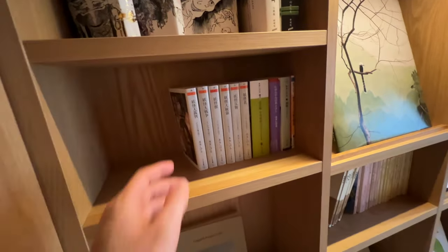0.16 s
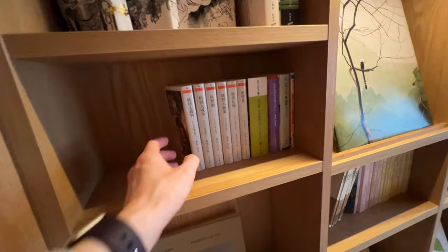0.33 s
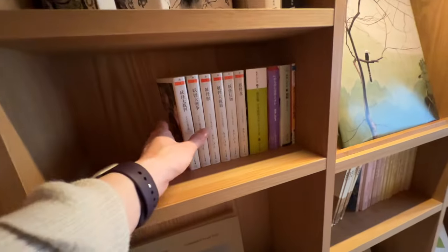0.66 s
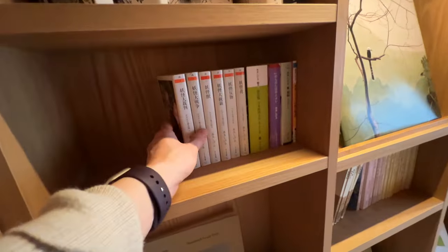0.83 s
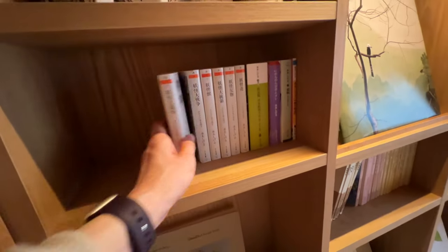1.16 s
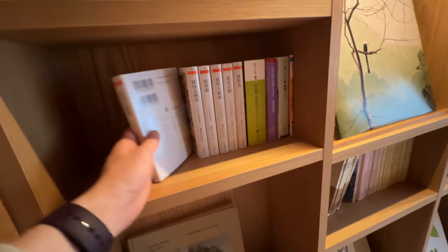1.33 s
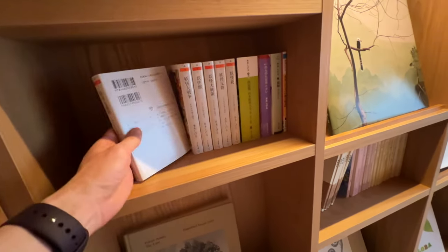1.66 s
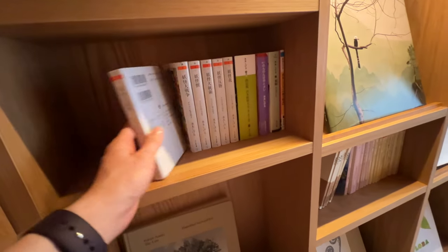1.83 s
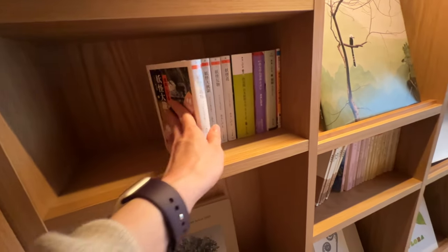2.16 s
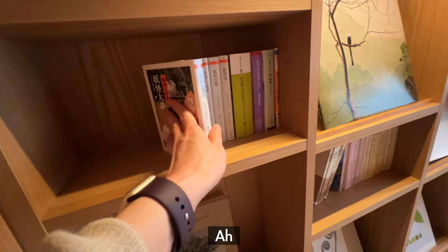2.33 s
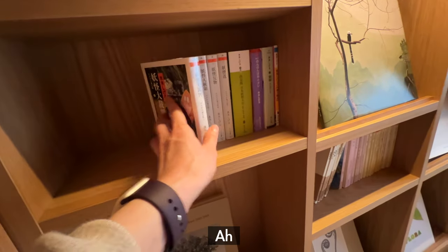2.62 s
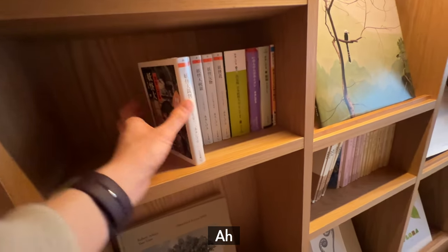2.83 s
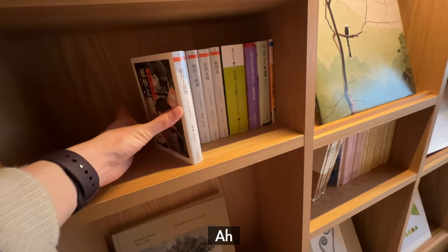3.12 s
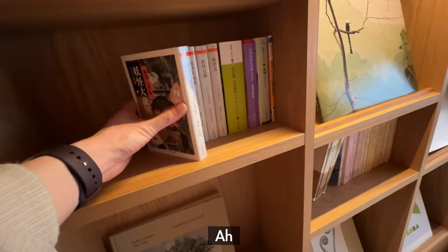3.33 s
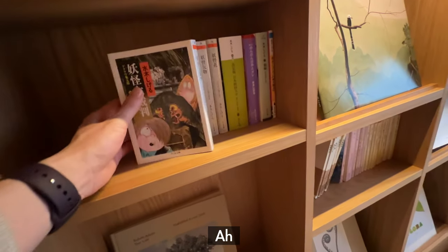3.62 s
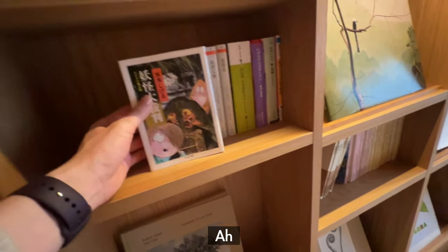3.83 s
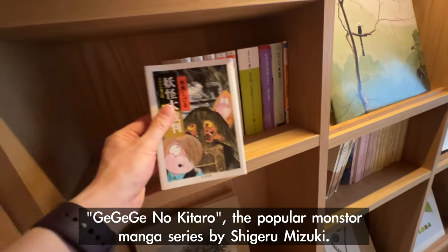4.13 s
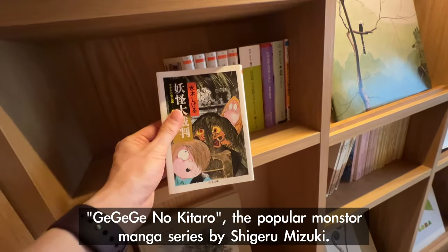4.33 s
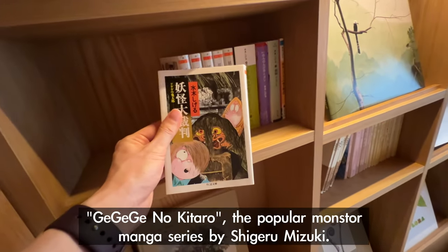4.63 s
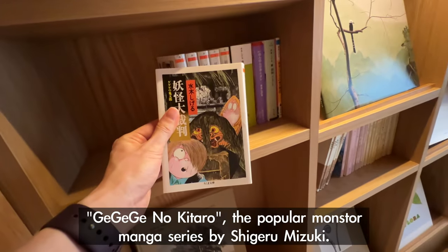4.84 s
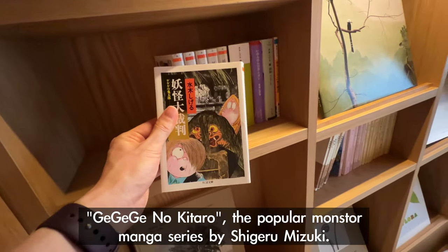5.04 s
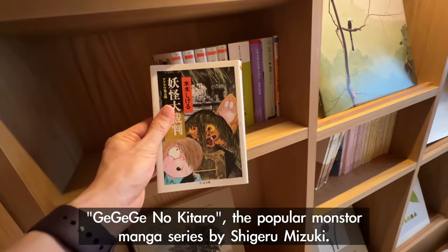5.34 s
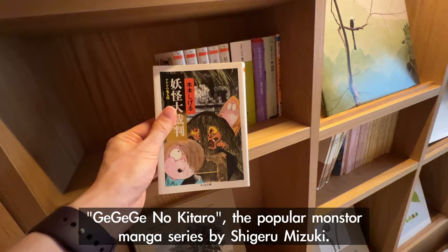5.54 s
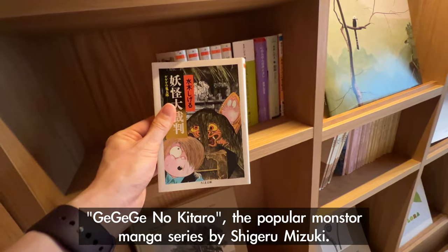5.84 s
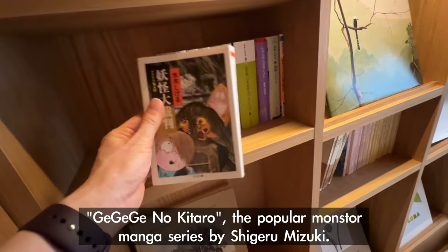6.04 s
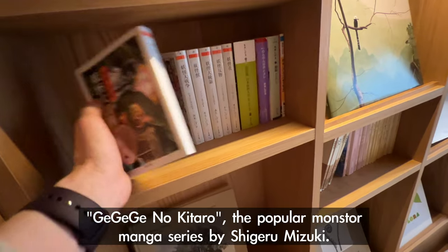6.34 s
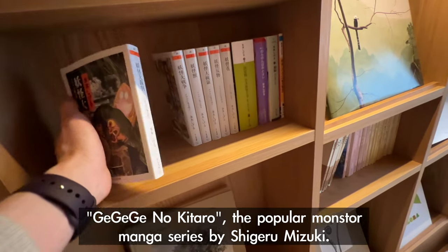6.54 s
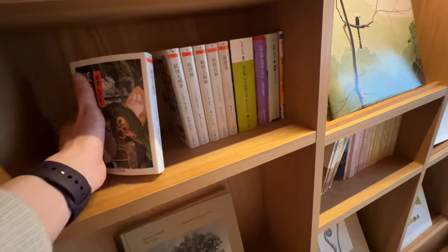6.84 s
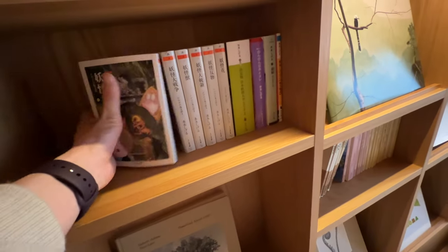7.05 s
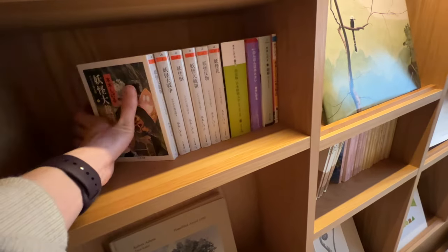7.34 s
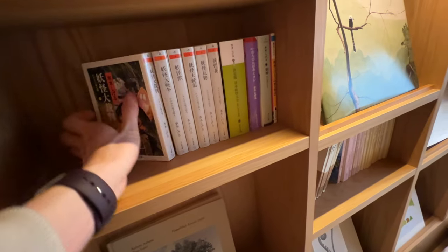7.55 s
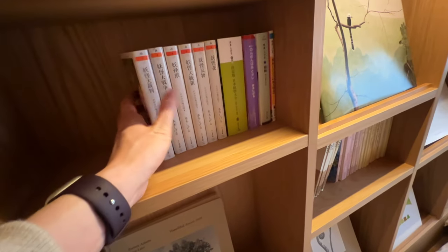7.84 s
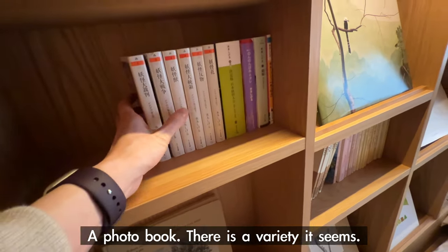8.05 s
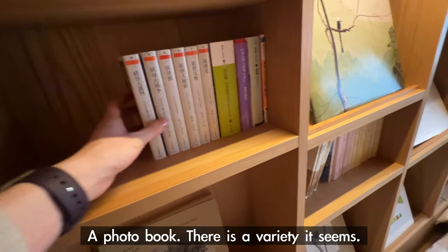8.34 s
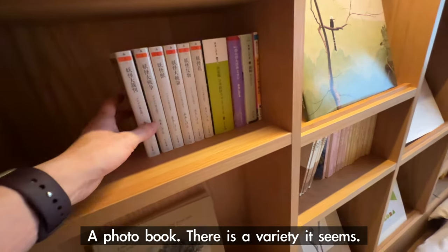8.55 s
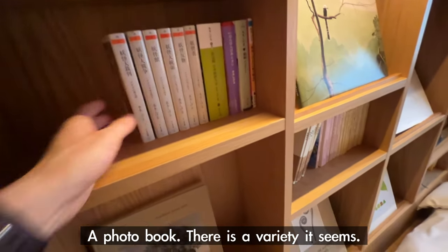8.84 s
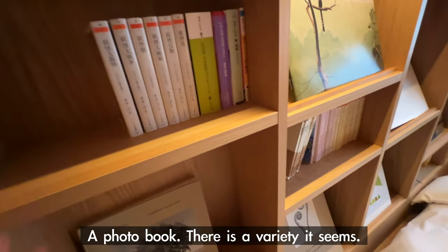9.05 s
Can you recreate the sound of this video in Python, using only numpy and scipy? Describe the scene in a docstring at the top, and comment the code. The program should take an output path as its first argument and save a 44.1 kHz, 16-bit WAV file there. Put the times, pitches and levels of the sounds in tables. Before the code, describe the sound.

Papery scrapes and low hollow wooden knocks as a small book is pulled from a shelf, held still, then slid back into place.

```python
"""A paperback is slid out of a tight row on a wooden shelf, turned, dragged across its neighbours' spines
and pushed back with light knocks. Strokes are noise shaped into paper hiss, board rasp and compartment drone;
knocks are a swelling boom with struck boards, a rap and a papery tick, some in fast juddering runs.
A quiet room hums underneath as shaped noise; two microphones a head apart listen, the left one nearer."""
import sys
import numpy as np
from scipy import signal
from scipy.fft import rfft, irfft, next_fast_len
from scipy.io import wavfile
from scipy.ndimage import uniform_filter1d, map_coordinates

SR = 44100
rng = np.random.default_rng(int(sys.argv[2]) if len(sys.argv) > 2 else 0)


def store_wav(level_fs):
    """Save 16-bit WAV to argv[1]."""
    pcm = np.round(np.clip(np.atleast_2d(level_fs), -1, 1) * 32767)
    wavfile.write(sys.argv[1], SR, pcm.T.astype(np.int16))


N = 404838

# resonances of the shelf boards, the lowest three first: (f/Hz, width/Hz, gain of one pass/dB)
BOARD_MODES = [(580, 550, -6.5), (818, 155, 1.5), (925, 170, -4.5), (1238, 290, 1), (1674, 350, 1),
               (1816, 295, 0), (2760, 600, -11)]
# colour of paper noise: (f/Hz, relative level per Hz/dB)
PAPER_COLOUR = [(1500, -31), (2300, -5.5), (3000, 0), (4500, -3.5), (6400, -0.5), (8600, -1.5), (12500, -7),
                (16000, -15.5)]


def amp(db):
    """dB to gain."""
    return 10 ** (np.asarray(db) / 20)


def unit(x):
    """Scaled to rms 1 over all channels together."""
    return x / np.sqrt(np.mean(x ** 2) + 1e-20)


def peak(x):
    """Each channel scaled to peak 1."""
    return x / np.abs(x).max(axis=-1, keepdims=True)


def along(points, hz):
    """Curve through (f/Hz, value) points on a log frequency axis."""
    f, v = np.transpose(points)
    return np.interp(np.log(hz + 1), np.log(f + 1), v)


def filtered(x, response):
    """x times a complex response of frequency, zero-padded for the tail."""
    n = x.shape[-1]
    m = next_fast_len(n + 4096)
    return irfft(rfft(x, m) * response(np.fft.rfftfreq(m, 1 / SR)), m)[..., :n]


def modes(table):
    """Causal response of a set of resonances, alternating in sign."""
    def response(f):
        total = 0
        for k, (centre, width, db) in enumerate(table):
            damping = 1j * f * width
            total = total + (-1) ** k * amp(db) * damping / (centre * centre - f * f + damping)
        return total
    return response


def wobble(rate):
    """A smooth random curve, rate knots a second."""
    knots = rng.standard_normal(int(N * rate / SR) + 4)
    return map_coordinates(knots, [np.arange(N) * rate / SR])


def patchy(patchy_db):
    """Two unrelated noises under one field of narrow, slowly drifting resonances."""
    z = signal.stft(rng.standard_normal((2, N)), nperseg=512)[2]
    field = uniform_filter1d(rng.standard_normal(z.shape[1:]), size=3, axis=0)  # across frequency
    field = uniform_filter1d(field, size=18, axis=1)  # across time
    return signal.istft(z * amp(patchy_db * unit(field)), nperseg=512)[1][:, :N]


def ears(pair, alike, left, lead):
    """Two unrelated versions of a sound mixed to a given left-right likeness, balance and phase lead."""
    def spread(hz):
        turn = np.arccos(np.clip(along(alike, hz), 0, 1)) / 2
        return np.array([np.cos(turn), np.sin(turn)])

    def balance(hz):
        half = amp(along(left, hz) / 2) * np.exp(.5j * along(lead, hz))
        return np.array([half, 1 / half])

    mid, side = filtered(pair, spread)
    return filtered(np.array([mid + side, mid - side]), balance)


def strokes():
    """Friction: fibres hiss and the uneven drag shakes the boards; separate noise drones in the compartment."""
    # air in the compartment: (f/Hz, width/Hz, gain of one pass/dB)
    compartment = [(208.6, 40, -0.5), (332.6, 32, 1.5), (431.4, 79, -1.5)]
    hiss_db, rasp_db, drone_db = envelopes()
    grip_db = 1.4 * wobble(9) + 0.71 * wobble(30) + 0.7 * wobble(160)  # the grip catches and slips
    hiss = unit(filtered(patchy(patchy_db=3.0), lambda hz: amp(along(PAPER_COLOUR, hz))))

    drag = patchy(patchy_db=4.0)
    rasp = unit(filtered(drag, modes(BOARD_MODES[3:])))
    # squared responses: two passes through the resonances
    low = unit(filtered(drag, lambda hz: modes(BOARD_MODES[:3])(hz) ** 2))
    low_db = 0.61 * rasp_db + 0.43 * drone_db + 1.0  # a heavier stroke reaches the lower modes
    drone = unit(filtered(rng.standard_normal((2, N)), lambda hz: modes(compartment)(hz) ** 2))

    paper = amp(hiss_db + grip_db) * hiss
    boards = amp(rasp_db + grip_db) * rasp + amp(low_db + grip_db) * low
    return paper + boards + amp(drone_db) * drone


def envelopes():
    """Each stroke sets in, swells or sags along a line, and dies; dB of hiss, rasp and drone."""
    # sliding strokes, levels before grip and stereo balance:
    # (start t/s, end t/s, hiss at start/dB, hiss at end/dB, mid-stroke rasp/dB, mid-stroke drone/dB)
    stroke_list = [(0, 0.59, -80.5, -83.5, -91, -85), (0.812, 1.087, -64.5, -48.5, -54.5, -58),
                   (1.098, 1.335, -53.5, -47, -53.5, -53.5), (1.362, 1.438, -42.5, -44.5, -41, -50.5),
                   (1.651, 1.707, -57.5, -55, -51, -44), (1.772, 1.955, -42, -47.5, -43.5, -33),
                   (1.98, 2.061, -45, -54, -49, -50), (2.1, 2.207, -59, -56.5, -51.5, -60.5),
                   (2.55, 2.618, -72.5, -68.5, -63.5, -57.5), (2.636, 2.686, -48.5, -53.5, -49.5, -56),
                   (2.814, 2.841, -69, -81, -86, -88), (3.006, 3.035, -75, -73.5, -83, -88),
                   (3.17, 3.299, -59.5, -54.5, -51, -62), (3.32, 3.45, -53, -53.5, -47, -61),
                   (3.509, 3.71, -57, -62.5, -51, -43), (3.729, 3.763, -57, -58.5, -51.5, -49.5),
                   (3.856, 3.903, -53, -50.5, -42, -34.5), (3.936, 4.019, -60.5, -70, -61, -49),
                   (4.248, 4.249, -67, -71, -73, -64.5), (5.887, 5.95, -73.5, -86.5, -73.5, -73.5),
                   (6.099, 6.177, -70.5, -72.5, -72, -78.5), (6.219, 6.427, -90, -69, -77.5, -79),
                   (6.475, 6.495, -54, -59.5, -60, -68.5), (6.494, 6.634, -66.5, -70, -70, -84),
                   (6.706, 6.907, -56.5, -58, -62, -82), (6.934, 7.083, -50.5, -52, -49, -57.5),
                   (7.106, 7.252, -64, -49.5, -52.5, -59.5), (7.26, 7.347, -57, -63, -58, -51),
                   (7.386, 7.512, -65, -67, -59, -66), (7.575, 7.663, -47, -44, -45.5, -58.5),
                   (7.677, 7.803, -47.5, -48, -51.5, -55.5), (7.8, 7.967, -73.5, -62, -58, -55.5),
                   (7.972, 8.064, -67.5, -87, -60, -49), (8.08, 8.199, -73.5, -78.5, -79, -66.5),
                   (8.214, 8.403, -70, -75, -80.5, -70.5), (8.395, 8.5, -82, -83, -76.5, -61),
                   (8.595, 9.18, -95.5, -84, -98, -92)]
    # how a stroke sets in, and how it dies: (hiss, rasp, drone), all in dB/s
    rise_db_per_s = [601, 501.5, 455]
    fall_db_per_s = [702, 444.5, 351]
    # share of the hiss's swell in dB that each layer takes: (hiss, rasp, drone)
    follows = [1, 0.92, 0.18]
    # the holding hand is never quite still: (hiss/dB, rasp/dB, drone/dB)
    rest_db = [-87, -95.5, -82.5]
    linger_db, linger_db_per_s = -11, 221  # a faint rustle outlasts each stroke

    t = np.arange(0, N, 32) / SR
    col = lambda v: np.array(v)[:, None]
    power = amp(col(rest_db)) ** 2 + 0 * t
    for start, end, first_db, last_db, rasp_db, drone_db in stroke_list:
        swell_db = np.interp(t, [start, end], [-.5, .5]) * (last_db - first_db)
        before = np.maximum(start - t, 0)
        after = np.maximum(t - end, 0)
        fall_db = np.minimum(col(fall_db_per_s) * after, linger_db_per_s * after - linger_db)
        edge_db = col(rise_db_per_s) * before + fall_db
        middle_db = col([(first_db + last_db) / 2, rasp_db, drone_db])
        power = power + amp(middle_db + col(follows) * swell_db - edge_db) ** 2
    return [np.interp(np.arange(N) / SR, t, 10 * np.log10(p)) for p in power]


def knocks():
    """Each contact: a rap of the boards, a papery tick, then a swelling boom of the compartment."""
    # contacts of book on spines and boards, levels before stereo balance:
    # (t/s, boom level/dB, boom f/Hz, wood over boom/dB, rap over boom/dB, tick over rap/dB)
    contacts = [(1.645, -44, 232, 0.5, -16, 5), (1.664, -36, 216, -1.1, -11.5, -1),
                (1.695, -34.5, 225, -8.5, -5, 10), (1.75, -21.5, 366, -4, -13.5, 10.5),
                (1.772, -18.5, 361, -9, -12, 5.5), (1.802, -17, 360, -11, -5.5, -4),
                (1.828, -13, 377, -1, -11, 6), (1.934, -19, 407, -3, -18, -2),
                (1.945, -33.5, 342, 7.5, -12, -6), (3.499, -43, 354, -31.5, -6, -11),
                (3.729, -38.5, 445, -1, -6, 1), (3.81, -35.5, 427, -11, -1.8, -9.5),
                (3.856, -23, 354, -20, -2, -5), (3.868, -20, 366, -17.5, -11, 3.5),
                (3.883, -13, 366, -13.5, -16, 9.5), (3.908, -24, 373, -2.5, -9.5, -5),
                (3.955, -41, 374, -5, -15.5, -7), (3.99, -37, 363, -19.5, -17, -5),
                (5.872, -57.5, 297, 13, 19, -20.5), (6.012, -68.5, 300, 3.5, 8.5, -15),
                (6.205, -54.5, 209, -3, -3, -16), (6.28, -70, 300, 13, 12, -20),
                (6.298, -71.5, 208, 20, 14, -19), (6.457, -53, 220, -13, 7, 5),
                (6.912, -22, 357.5, -17.5, -22, -5), (7.117, -42.5, 223, -14, 5, -9.5),
                (7.222, -19, 340, -2.5, 3, -17), (7.318, -37.5, 352, -5.5, -5.5, -3),
                (7.461, -63, 338, -8, 10.5, -3), (7.551, -63, 376, -28, 20, 3),
                (7.646, -30, 359, -24.5, -5, -5), (7.803, -27, 179, -11.5, -5, -3.5),
                (7.964, -27.5, 344, 1.1, 4, -17.5), (8.39, -53, 350, -6, -5, -19),
                (8.425, -45, 365, -6.5, -23.5, -15), (8.466, -49, 352, -6, -13, -11)]
    dull_hz = 3500  # a soft paper edge excites the boards little above this
    t = np.arange(SR // 10) / SR
    swell = lambda after, width: np.exp(-((t - after) / width) ** 2)
    soft = lambda f: 1 / (1 + 1j * f / dull_hz) ** 2
    struck_low = lambda f: modes(BOARD_MODES[:3])(f) * 1j * f * soft(f) ** 2
    struck_high = lambda f: modes(BOARD_MODES[3:])(f) * soft(f)
    paper = lambda f: amp(along(PAPER_COLOUR, f))
    fade = lambda s: amp(-60 * t / s)  # falls 60 dB in s seconds

    # the air takes a few cycles to build up, then swells again more faintly
    shape = (swell(0.0083, 0.0062) + amp(-14.0) * swell(.026, 0.008)) * np.tanh(t / 0.00084)
    first_only = np.array([[1], [0]])  # the part the two ears share most
    detune = np.array([[1], [1.15]])  # the second version is higher, and quieter
    out = np.zeros((2, N + len(t)))
    for s, boom_db, hz, wood_db, rap_db, tick_db in [*contacts, *slips()]:
        grit, rattle, rustle = rng.standard_normal((3, 2, len(t)))
        boom = shape * np.sin(2 * np.pi * hz * t * detune) * amp([[0], [-8]])
        # the shelf's frame sways after, more in deep thuds
        push_gain = amp(-24 + 20.5 * np.log2(350 / hz))
        push = push_gain * swell(0.024, 0.0065) * np.sin(2 * np.pi * .47 * hz * t)
        overtone = amp(-15.5) * fade(0.1) * np.sin(2 * np.pi * 1.55 * hz * t)

        # a soft paper edge, with some grit
        blow = swell(0.00086, .0003) * first_only + .05 * grit * fade(.015)
        wood = peak(filtered(blow, struck_low))
        rap = peak(filtered(rattle * np.tanh(t / 0.0016) * fade(0.039), struck_high))
        tick = peak(filtered(rustle * (fade(0.025) + amp(-24.5) * fade(0.049)), paper))

        body = boom + (push + overtone) * first_only
        surface = amp(wood_db) * wood + amp(rap_db) * (rap + amp(tick_db) * tick)
        out[:, round(s * SR):][:, :len(t)] += amp(boom_db) * (body + surface)
    return out[:, :N]


def slips():
    """The edge catches and slips eight times a judder, with shrinking gaps and some random scatter."""
    # judders before scatter: (first t/s, first gap/s, next gap over it, first boom/dB, last boom/dB,
    # first f/Hz, last f/Hz, wood over boom/dB, rap over boom/dB, tick over rap/dB)
    judders = [(1.848, .016, .87, -11.5, -18.5, 354, 407.6, -4, -16, -9),
               (3.516, .026, .93, -30, -27.5, 372.3, 415.7, -12, -4, -5)]
    # scatter from slip to slip: (t/s, boom/dB, f/Hz, wood/dB, rap/dB, tick/dB)
    scatter = [.001, 2.1, 15, 1.8, 1.4, 2.5]
    k = np.arange(8)
    runs = []
    for s, gap, shrink, db0, db1, hz0, hz1, *colour_db in judders:
        times = s + gap * (1 - shrink ** k) / (1 - shrink)
        boom_db = db0 + (db1 - db0) * (k / k[-1]) ** 2.5
        colours = [db + 0 * k for db in colour_db]
        runs.append(np.transpose([times, boom_db, np.linspace(hz0, hz1, len(k)), *colours]))
    rows = np.concatenate(runs)
    return rows + rng.standard_normal(rows.shape) * scatter


def room_tone():
    """Distant ventilation and traffic rumble over faint microphone hiss, all one shaped noise."""
    # colour of the room: (f/Hz, relative level per Hz/dB)
    hum_colour = [(12, -52.5), (20, -27.5), (32, -10), (49, -12), (70, 1), (168, -11), (187, -22),
                  (222, -18.5), (277, -38.5), (590, -41.5), (825, -48), (1960, -48.5), (5380, -74),
                  (7110, -57), (16000, -64.5)]
    # (f/Hz, left-right likeness 0-1)
    hum_alike = [(60, 1), (250, 0.84), (400, 0.79), (1000, .05), (6000, 0.035), (8000, 0.3)]
    # (f/Hz, left over right/dB)
    hum_left = [(60, 1.5), (3000, 6), (6000, 5), (7000, 21), (8500, 15), (11000, -4)]
    hum_db = -51.5  # before stereo balance
    noise = unit(filtered(rng.standard_normal((2, N)), lambda hz: amp(along(hum_colour, hz))))
    hum_lead = [(50, 0.15), (500, 1.0)]  # (f/Hz, left leads by/rad)
    return amp(hum_db) * ears(noise, hum_alike, hum_left, hum_lead)


def scene():
    """The shelf at both microphones, over the room."""
    # the shelf's stereo balance: (f/Hz, left over right/dB)
    shelf_left = [(100, 5.5), (260, 3.5), (480, 6), (750, 5), (1300, 0.5), (2300, -3), (3500, 11),
                  (5500, 13.5), (7000, 1), (8500, 3), (10500, -0.5)]
    # (f/Hz, left-right likeness 0-1)
    shelf_alike = [(100, 0.31), (300, 1), (500, 0.14), (800, 0.63), (2000, 0.33), (2500, 0.15),
                   (3600, 0.26), (5500, 0.16), (7500, 0.53), (11000, 0.41)]
    # rubbing: (f/Hz, left leads by/rad)
    rub_lead = [(50, 0.1), (350, 1.7), (700, 2.3), (1000, 3.45), (1350, 2.5), (1800, 4.1), (2600, 5.6),
                (3200, 3.2), (4200, 6.28)]
    # blows: (f/Hz, left leads by/rad)
    knock_lead = [(50, 0.11), (450, 0.45), (850, .1), (1050, 2.2), (2100, 3), (4000, 4.8)]
    rubbing = ears(strokes(), shelf_alike, shelf_left, rub_lead)
    blows = ears(knocks(), shelf_alike, shelf_left, knock_lead)
    return rubbing + blows + room_tone()


def record(dry):
    """The microphone housing cuts narrow notches; nothing is kept above the band limit."""
    # housing notches: (f/Hz, width/Hz, depth 0-1)
    notches = [(5360, 270, 0.7), (7700, 550, 0.6), (10380, 1500, 0.44)]
    top_hz = 15850

    def housing(hz):
        gain = 1
        for centre, width, depth in notches:
            gain = gain * (1 - np.clip(depth, 0, 1) * np.exp(-((hz - centre) / width * 2) ** 2))
        return gain

    return filtered(dry, lambda hz: housing(hz) * (hz < top_hz))


dry = scene()
out = record(dry)
store_wav(out)
```